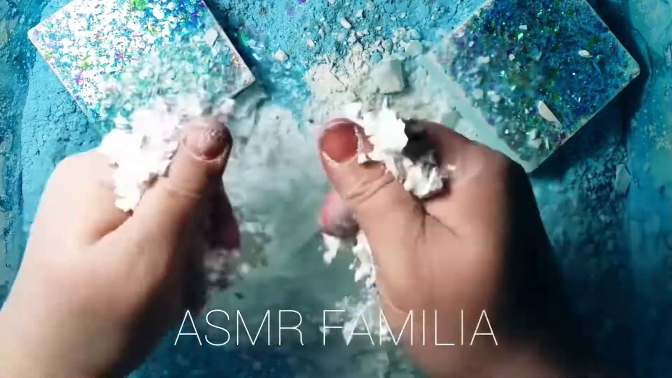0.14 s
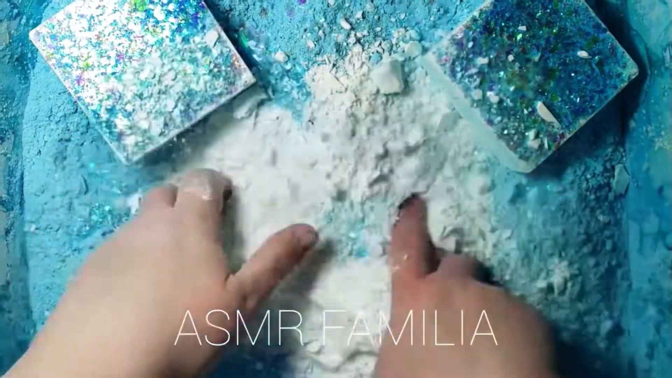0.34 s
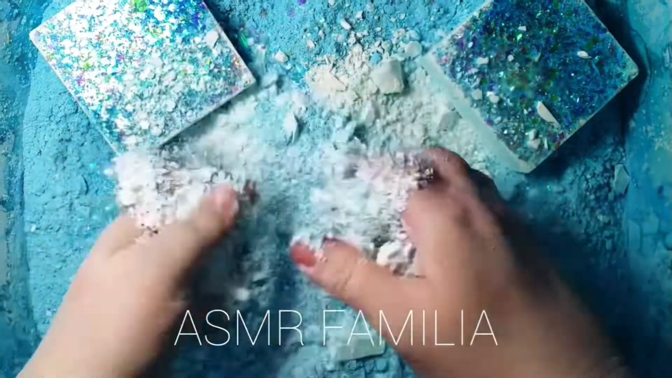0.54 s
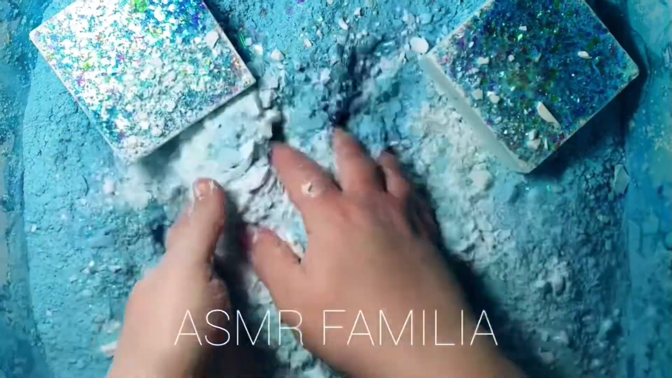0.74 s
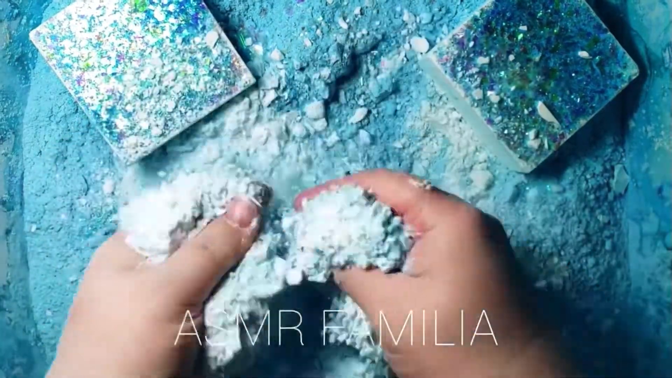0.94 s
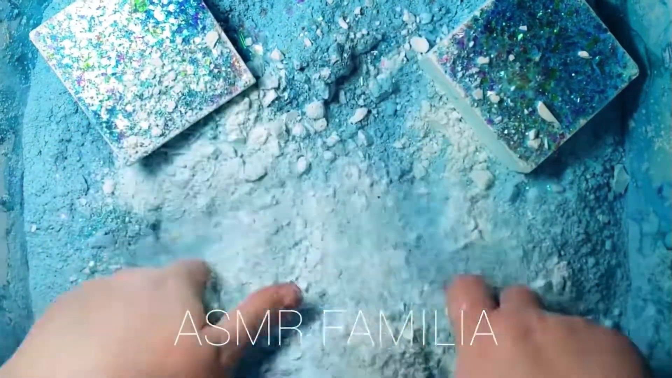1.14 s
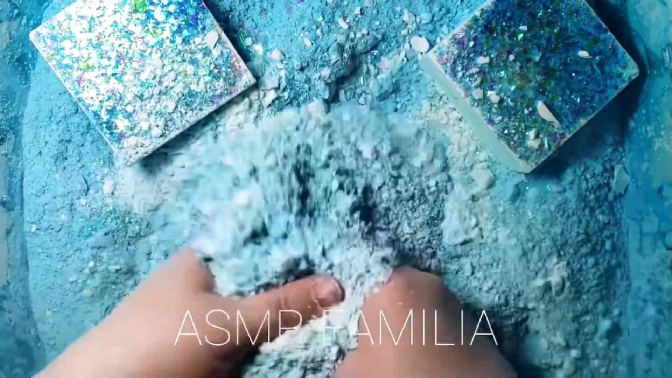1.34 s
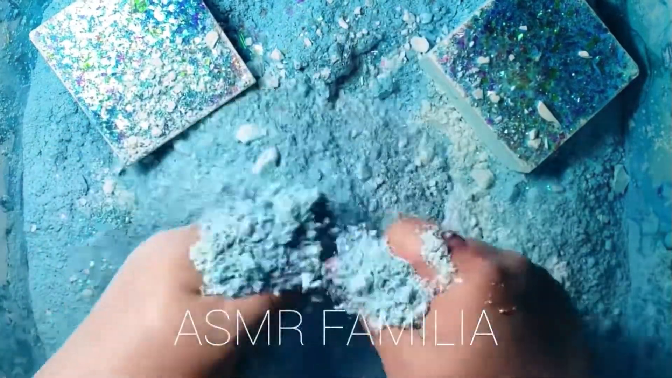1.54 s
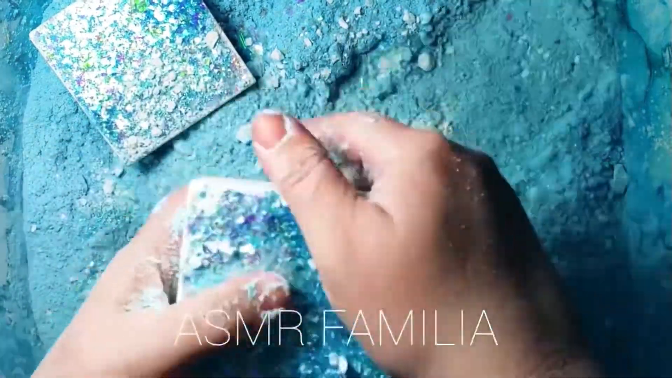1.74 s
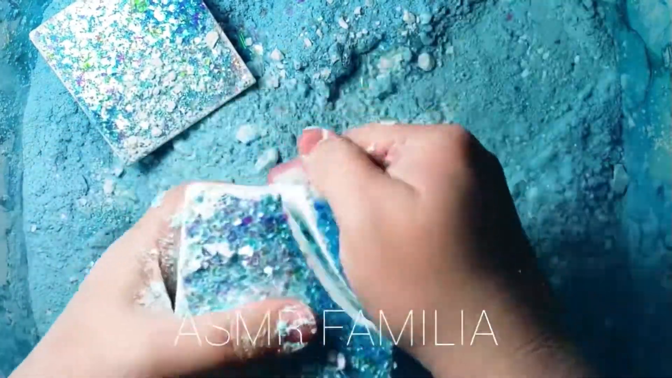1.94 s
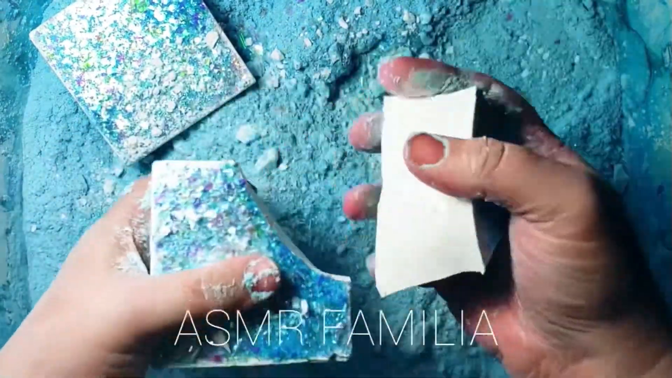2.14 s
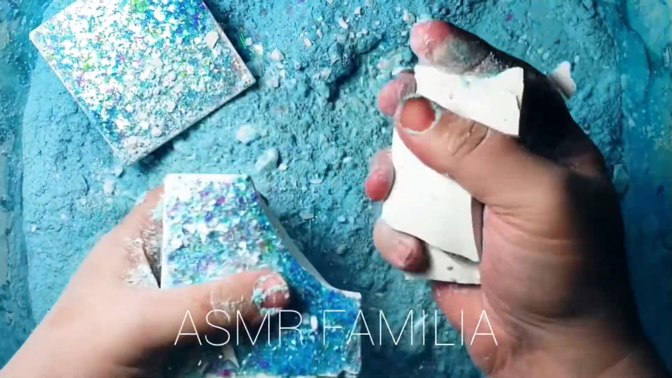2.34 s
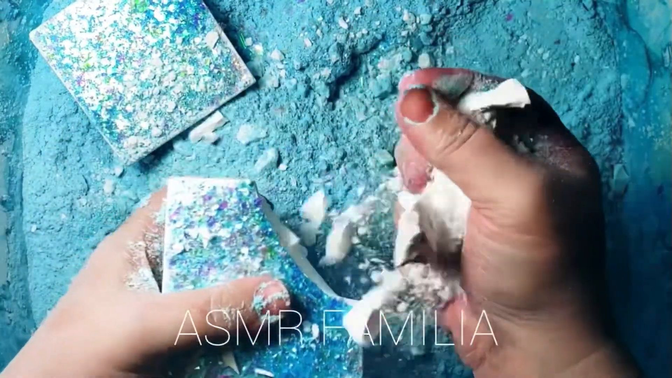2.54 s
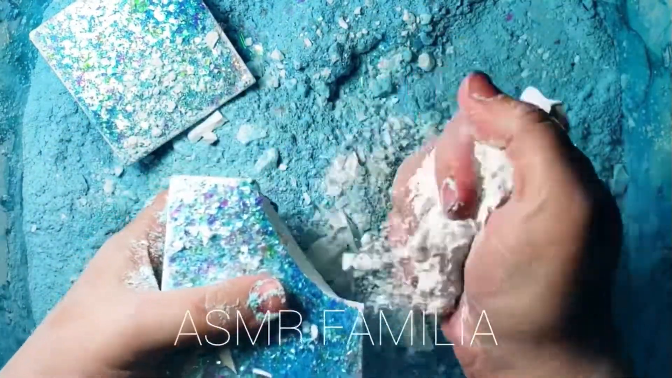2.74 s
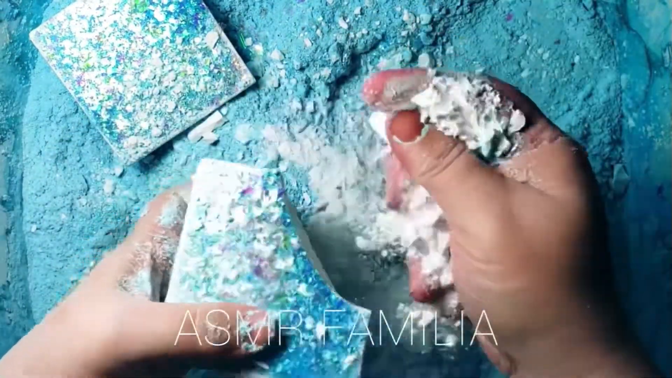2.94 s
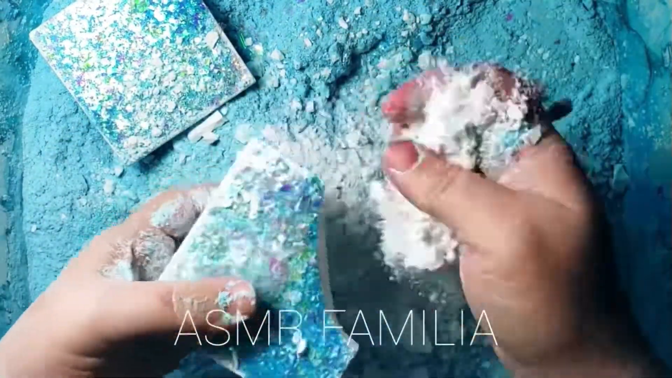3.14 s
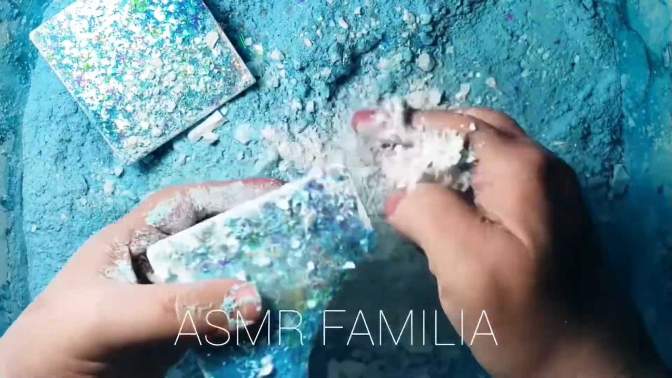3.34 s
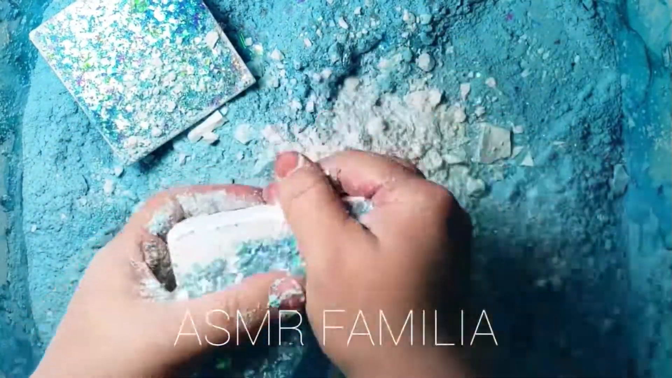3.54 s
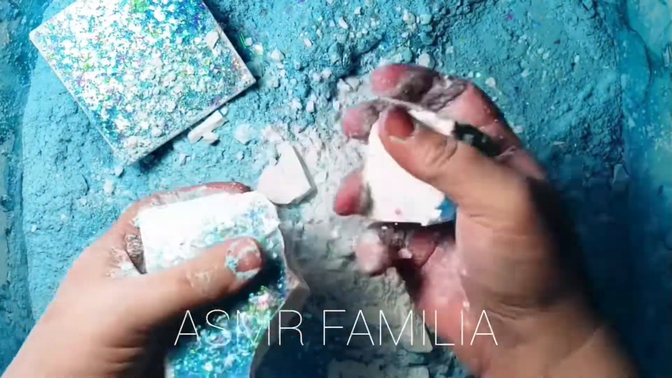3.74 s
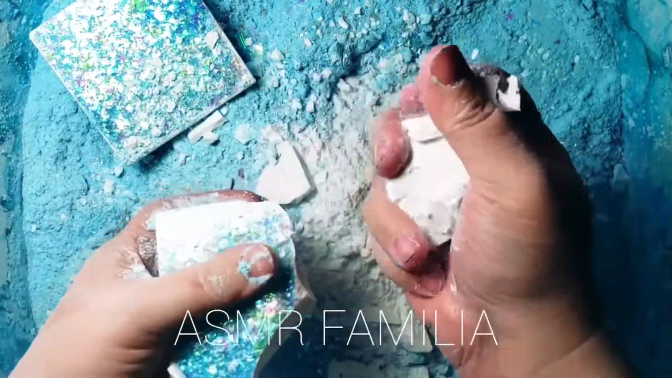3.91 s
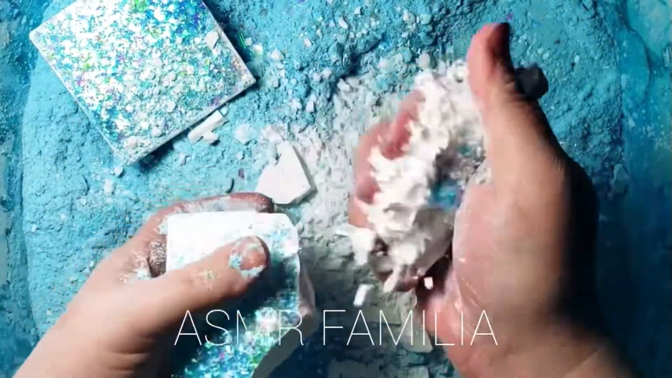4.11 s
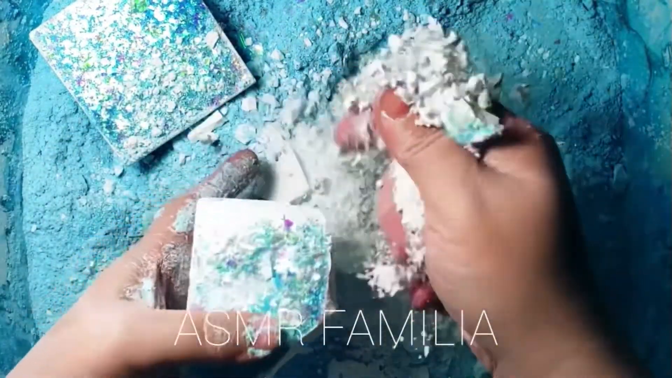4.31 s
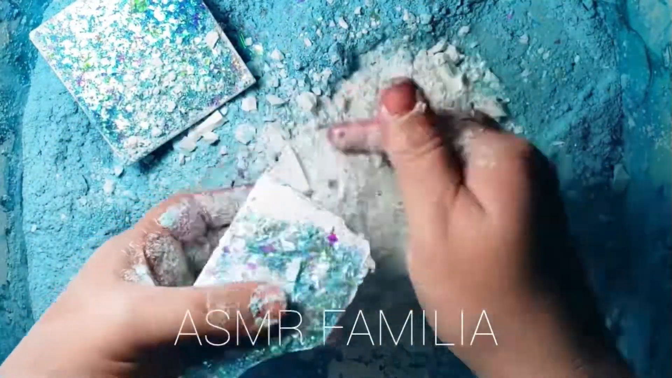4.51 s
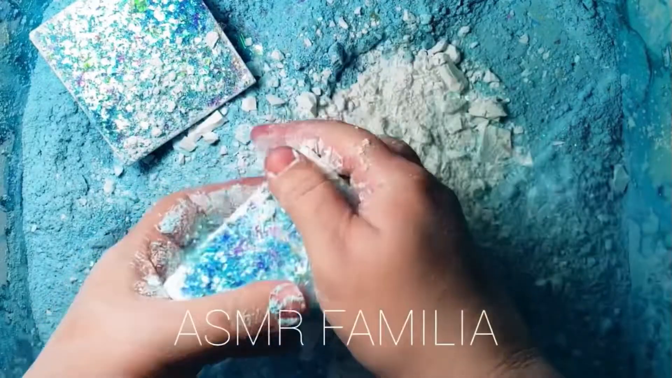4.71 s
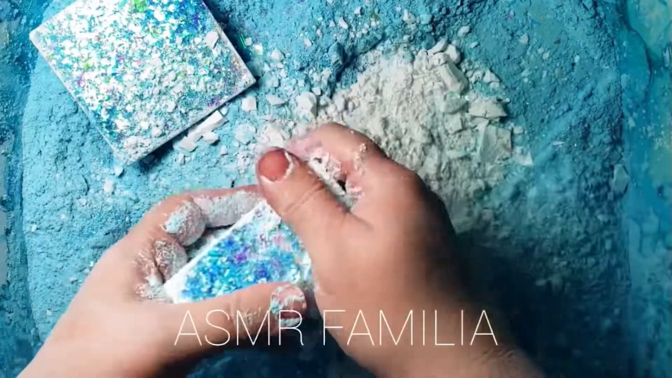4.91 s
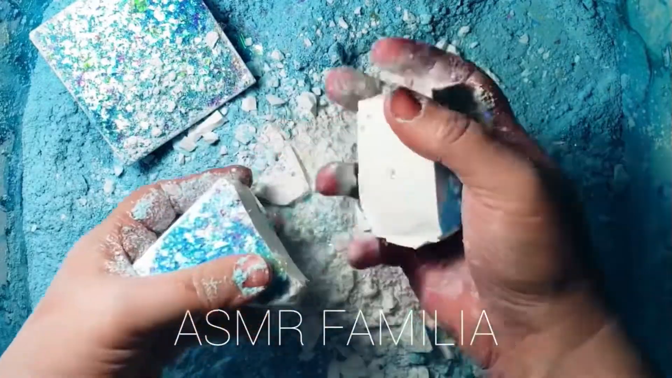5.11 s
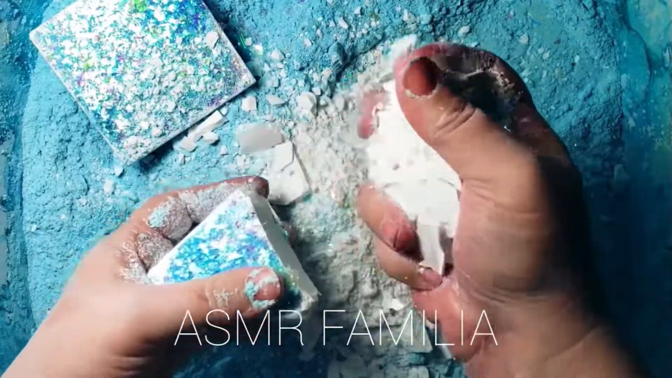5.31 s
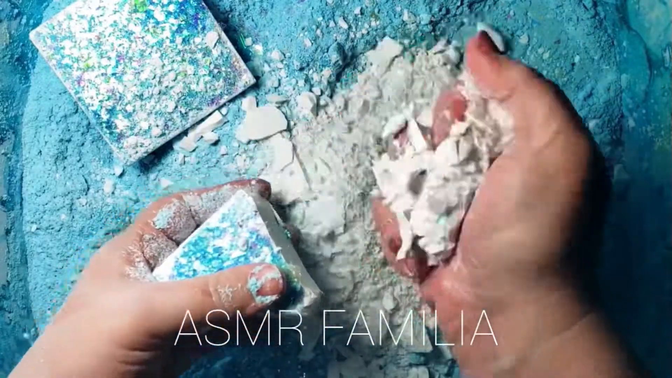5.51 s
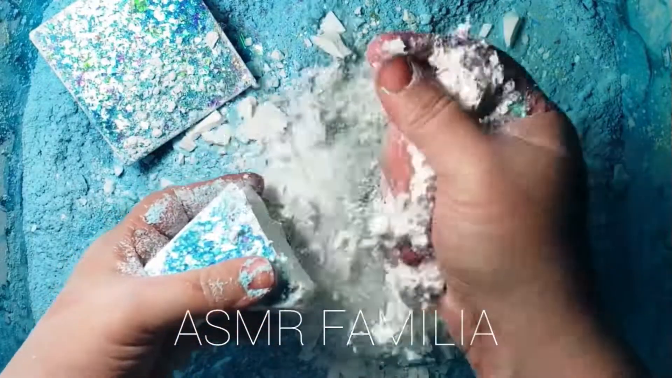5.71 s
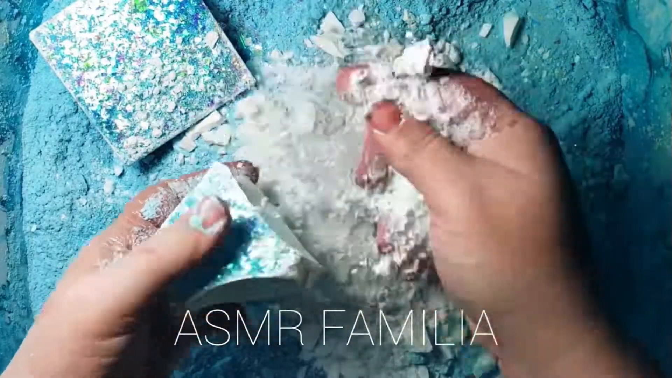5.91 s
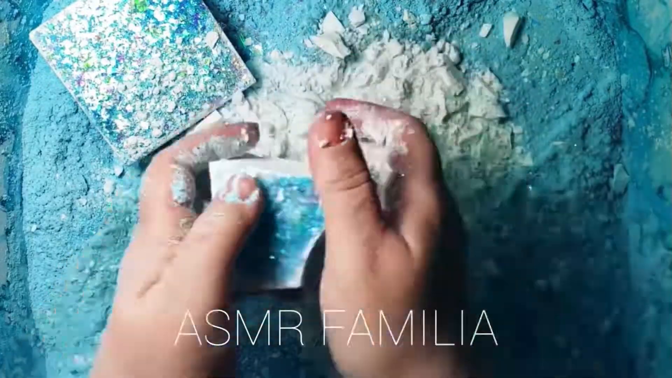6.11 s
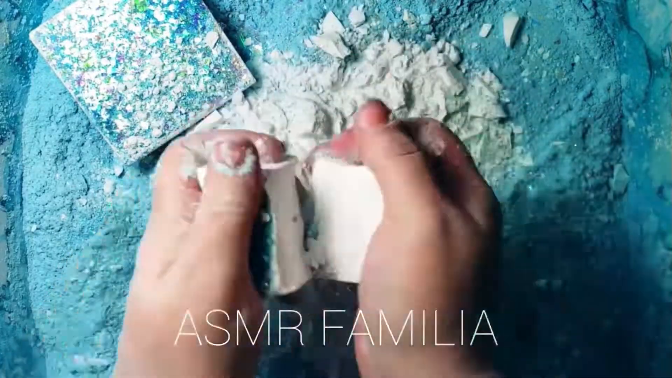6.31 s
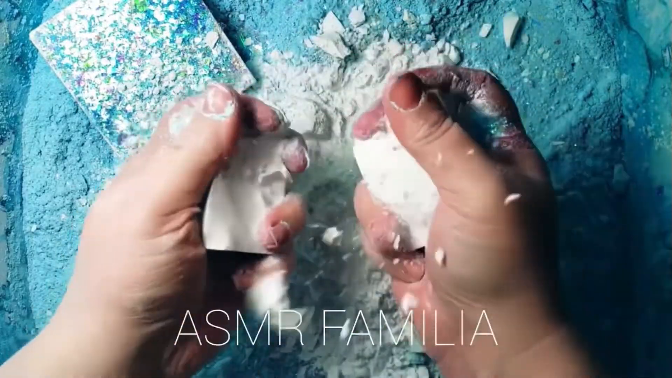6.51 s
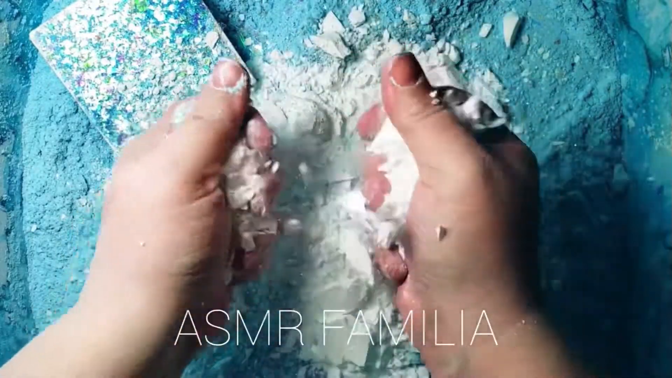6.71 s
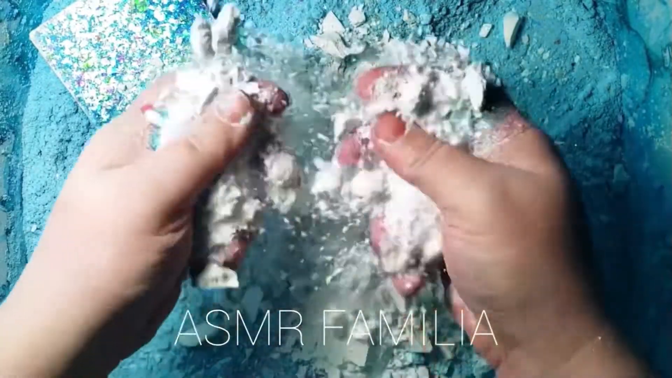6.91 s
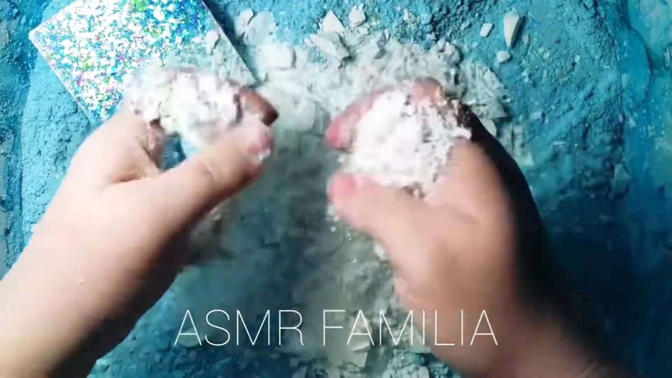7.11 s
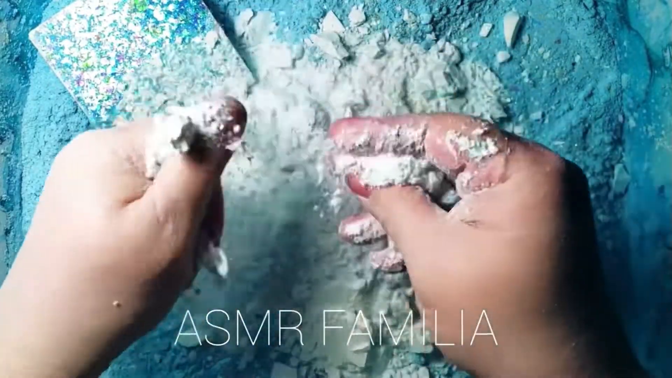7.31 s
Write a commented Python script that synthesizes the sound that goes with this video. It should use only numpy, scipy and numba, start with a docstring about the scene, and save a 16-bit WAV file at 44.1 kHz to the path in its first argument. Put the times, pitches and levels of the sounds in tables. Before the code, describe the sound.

Hands crush brittle chalk blocks over a powder-covered tray, very close to the microphone and nearly mono. Crunches and splinters open, then softer, duller powder squeezing follows. From about two seconds blocks snap sharply and crumble into grit, with short powdery hisses between breaks. The hardest cracks cluster near the end before a softer crumble, over a steady low hum.

```python
"""Two hands crush soft chalk blocks over a tray of powder, heard close.
Blocks give way in knocks and ragged crunches; splinters snap as short jolts, rings and ticks of noise.
Lumps, grit and dust crumble as dense random grains of filtered noise, and powder hisses under the fingers.
A ventilation hum, made of shaped noise, drones below.
Twice the level drops suddenly and fades back in; the loudest peaks clip."""
import sys
import numpy as np
from scipy import signal
from scipy.fft import rfft, irfft
from scipy.io import wavfile
from scipy.ndimage import uniform_filter1d
from numba import njit

SR = 44100
rng = np.random.default_rng(int(sys.argv[2]) if len(sys.argv) > 2 else 0)


def pcm_store(signal):
    """Save signal as 16-bit PCM."""
    levels = np.round(np.clip(np.atleast_2d(signal), -1, 1) * 32767)
    wavfile.write(sys.argv[1], SR, levels.astype(np.int16).T)


N = 324135  # length in samples
CONTROL_STEP = 128  # samples between points of a slow level curve


def undb(db):
    """Decibels to gain."""
    return 10 ** (np.asarray(db) / 20)


def level(x, db):
    """Scale to an rms level."""
    return x * undb(db) / np.sqrt(np.mean(x ** 2))


def walk(rate_hz):
    """Random levels, one per 1 / rate_hz seconds, smoothed into one another."""
    hold = int(SR / rate_hz)
    steps = np.repeat(rng.standard_normal(N // hold + 1), hold)
    return 0.7 * uniform_filter1d(steps, hold)[:N]


@njit
def grains(start_s, pitch_hz, width, t60_s, size, rise_s, noise):
    """Each grain is a burst of the given drive that rises, dies and passes through its own resonance."""
    out = np.zeros(len(noise))
    for e in range(len(start_s)):
        g = np.tan(np.pi * pitch_hz[e] / SR)
        damping = width  # resonance width / pitch
        fade = np.exp(-np.log(1000.) / (t60_s[e] * SR))  # 60 dB down after t60_s
        # narrow resonances pass less noise, so they are driven harder
        drive = size[e] / np.sqrt(g * damping / (1 + g * damping))
        band, low, up = 0., 0., 0.  # the two filter memories and the rising onset
        start = int(start_s[e] * SR)
        stop = min(len(noise), start + int(t60_s[e] * SR + 3 / (g * damping)))
        for i in range(start, stop):
            up += (1 - up) / (1 + rise_s * SR)
            push = drive * up * noise[(i + 977 * e) % len(noise)]  # each grain reads another stretch
            v = (band + g * (push - low)) / (1 + g * (g + damping))
            band = 2 * v - band
            low = low + 2 * g * v
            drive *= fade
            out[i] += damping * v
    return out


# colour of the hum: pitch_hz, density_db (dB per Hz, relative)
HUM_COLOUR = [(15, -42), (25, -11), (92, 0), (117, 4), (201, -11), (284, -8.5), (520, -26), (880, -23.5),
              (1500, -61)]
# loudness of the hum over time: time_s, level_db (rms)
HUM_LEVEL = [(0, -29.5), (5.2, -30.5), (6.1, -33.5), (6.6, -32), (7.35, -29)]


def hum():
    """Air rumbling in a duct, strongest near its resonance: noise with a shaped spectrum."""
    pitch_hz, density_db = np.transpose(HUM_COLOUR)
    f = np.arange(N // 2 + 1) * SR / N
    gain = undb(np.interp(np.log(f + 1), np.log(pitch_hz), density_db, right=-120))
    rumble = irfft(rfft(rng.standard_normal(N)) * gain, N)
    return level(rumble, np.interp(np.arange(N) / SR, *np.transpose(HUM_LEVEL)))


# hand movements (rub, scoop, squeeze, crumble): start_s, hold_s, lumps_db, grit_db, dust_db
MOVES = [(0.04, 0.15, -47, -33.5, -32), (0.382, 0.06, -41, -34, -37), (0.557, 0.031, -43, -39, -38.5),
         (0.69, 0.15, -29, -40, -57), (0.98, 0.11, -53, -34.5, -36), (1.167, 0.022, -32, -55, -63),
         (1.22, 0.11, -28.5, -63, -70), (1.385, 0.03, -27.5, -47, -60), (1.473, 0.11, -36.5, -32, -40.5),
         (2.262, 0.03, -46, -38, -38), (2.448, 0.064, -55, -31, -32.5), (2.68, 0.018, -40, -34.5, -34.5),
         (2.83, 0.25, -42.5, -36.5, -36.5), (3.184, 0.062, -47, -41, -37.5), (3.889, 0.095, -60, -32, -29),
         (4.203, 0.18, -41.5, -33.5, -34), (5.283, 0.05, -47, -27.5, -56),
         (5.465, 0.076, -47, -34.5, -35.5), (5.682, 0.035, -42.5, -35.5, -34),
         (5.92, 0.013, -44.5, -38.5, -35), (6.53, 0.011, -32.5, -31.5, -30), (6.65, 0.12, -39, -25.5, -29),
         (6.943, 0.11, -39.5, -31.5, -34.5), (7.241, 0.09, -48, -38, -41)]
# levels at rest, rows for lumps, grit, dust: before_db, after_db (either side of the last dropout)
STILL = [(-42, -56.5), (-46, -56), (-67, -42.5)]
SWELL_DB_S, SETTLE_DB_S = 226, 97  # how fast a movement builds and dies away, dB per second


def handling():
    """Levels in dB of lumps, grit and dust: movements swell, hold, settle and never cross the last dropout."""
    t = np.arange(0, N, CONTROL_STEP) / SR
    start_s, hold_s, *move_db = np.transpose(MOVES)[:, :, None]
    swell_db = -SWELL_DB_S * np.maximum(start_s - t, 0)
    settle_db = -SETTLE_DB_S * np.maximum(t - start_s - hold_s, 0)
    shape_db = swell_db + settle_db
    last_s = DROPOUTS[-1][0]
    same_side = (start_s < last_s) == (t < last_s)
    levels_db = []
    for db, still_db in zip(move_db, STILL):
        still_power = undb(np.where(t < last_s, *still_db)) ** 2
        move_power = np.sum(same_side * undb(db + shape_db) ** 2, axis=0)
        power_db = 10 * np.log10(still_power + move_power)
        levels_db.append(np.interp(np.arange(N) / SR, t, power_db))
    return levels_db


# lumps, grit and dust: lowest_hz, highest_hz, grains_per_s, base_t60_s, size_scatter_db
SIZES = [(187, 1550, 2400, 0.006, 3.5), (1040, 6000, 860, 0.009, 1.5), (4450, 22000, 2000, 0.013, 5.5)]
# how much each follows the flurries (factor): lumps, grit, dust
FLURRY_SHARE = (0.08, 1.12, 1.4)
# resonance width / pitch: lumps, grit, dust
GRAIN_WIDTH = (0.5, 0.61, 0.94)


def crumble(busy_db):
    """Lumps, grit and dust break at random; they come in shared flurries as the fingers slip."""
    out = 0
    flurry_db = 2.0 * walk(40) + 0.61 * walk(140)
    for sizes, db, share, width in zip(SIZES, busy_db, FLURRY_SHARE, GRAIN_WIDTH):
        lo_hz, hi_hz, rate, base_t60_s, scatter_db = sizes
        when, pitch, life, big = rng.random((20000, 4))[:int(rate * N / SR)].T
        pitch_hz = lo_hz * (hi_hz / lo_hz) ** pitch
        t60_s = base_t60_s * (1.25 + 3.2 * life)
        size = undb(-scatter_db * np.log(1 - .993 * big))  # many small grains, a few large
        noise = rng.standard_normal(N)
        bed = grains(when * N / SR, pitch_hz, width, t60_s, size, 0.00018, noise)
        # small grains radiate no bass
        bed = signal.lfilter(*signal.butter(2, 0.44 * lo_hz, "high", fs=SR), bed)
        out = out + level(bed * undb(share * flurry_db), db)
    return out


# loud single fragments snapping: start_s, level_db, pitch_hz (centre of their splinters)
SNAPS = [(0.068, -9, 2500), (0.1351, -2.5, 2600), (0.156, -4.5, 4840), (0.2603, -8.5, 2510),
         (0.42, -8.5, 5900), (0.4265, -12.5, 2900), (0.4842, -11, 4400), (1.024, -12, 5240),
         (1.0602, -8.5, 5600), (1.283, -12.5, 513), (1.391, -13, 1040), (1.4655, -5, 2900),
         (1.507, -12, 764), (1.5597, -12, 1550), (1.5745, -6, 2870), (1.5813, -6, 3300), (1.9132, -4, 1420),
         (1.9564, -11.5, 6200), (1.967, -16, 5000), (2.185, -21, 4680), (2.2574, -1, 4200),
         (2.3983, -5, 1610), (2.46, -3, 2600), (2.5, -0.5, 2600), (2.5362, -8, 2600), (2.553, -12, 4300),
         (2.6333, -1.5, 7050), (2.6494, -5.5, 7100), (2.6992, -8.5, 4010), (2.8135, -12, 3070),
         (2.861, -5.5, 5260), (2.925, -14, 4530), (2.957, -13, 1965), (3.026, -15, 1192),
         (3.052, -20, 1190), (3.1, -21, 1300), (3.5931, -5.5, 2850), (3.6298, -1, 5760),
         (3.7344, -5.5, 7000), (3.824, 0.5, 3540), (3.862, 5, 2640), (3.919, 0, 2830), (3.928, -7, 2800),
         (3.937, -1, 4640), (3.9422, -2.5, 2900), (3.9585, -4, 8500), (3.967, -4, 9350), (3.9815, -4, 4570),
         (4.0225, -11, 1210), (4.0331, -1.5, 5800), (4.041, -6, 5000), (4.046, -13.5, 1320),
         (4.153, -11.5, 5630), (4.249, -7, 7700), (4.288, -17, 1200), (4.367, -12.5, 1480),
         (4.8701, 4, 6400), (5.099, -18.5, 4960), (5.249, -10, 2600), (5.3356, -7, 2600),
         (5.3424, 2.5, 2600), (5.3609, -8, 4070), (5.408, -14, 2600), (5.4384, -5, 2850),
         (5.6416, -14.5, 5030), (5.698, -15, 4900), (5.7242, -9.5, 4900), (5.9052, -12.5, 5550),
         (5.953, -12.5, 4440), (6.468, -15, 7800), (6.497, -3.5, 5030), (6.5204, 5.5, 1910),
         (6.526, 9, 4240), (6.548, -3, 4800), (6.561, -3, 4630), (6.6229, 4, 5700), (6.676, -4.5, 4770),
         (6.7015, -4, 1480), (6.71, -4, 5060), (6.7171, 10, 4640), (6.7393, 1, 4460), (6.75, -3, 3566),
         (6.7629, 2, 4800), (6.7812, -7, 4230), (6.963, -3.5, 6820), (7.071, -9.5, 1330),
         (7.317, -10.5, 1790)]
# pitch range of the small random fragments: lowest_hz, highest_hz
CRACKLE_RANGE = (886, 7000)
CRACKLE_PER_S = 210
CRACKLE_DB, CRACKLE_SCATTER_DB = 8, 4  # smallest level relative to the grit; scatter above it


def fragments(grit_db):
    """The loud snaps, and many small ones at random that are as strong as the grit is busy."""
    when, pitch, big = rng.random((1800, 3))[:int(CRACKLE_PER_S * N / SR)].T
    nearby_grit_db = grit_db[(when * N).astype(int)]
    level_db = nearby_grit_db + CRACKLE_DB - CRACKLE_SCATTER_DB * np.log(1 - .9 * big)
    lo_hz, hi_hz = CRACKLE_RANGE
    pitch_hz = lo_hz * (hi_hz / lo_hz) ** pitch
    return np.hstack([np.transpose(SNAPS), [when * N / SR, level_db, pitch_hz]])


# a fragment parts in steps: latest_s (after the snap), pitch_ratio (before scatter), level_db (relative)
SPLINTERS = [(0, 0.93, 0), (.002, .5, -9), (.0008, 2.1, 0), (.004, .8, -4)]
TICK_DB, TAIL_DB = -11, -26.5  # drive of the noise tick and its tail, relative to the snap
SPIKE_DB, SPIKE_T60_S = -5, .00025  # drive of each splinter's jolt; length of the push for jolt and ring
RING_DB, RING_WIDTH = -1, .12  # a splinter's own ring: relative drive, width / pitch
SPIKE_SCATTER_DB = 2.5  # random spread either way, splinter to splinter


def snaps(grit_db):
    """Splinters part within milliseconds, each a jolt and a ring, in a noise tick; also a treble burst
    of noise, opposite in the two channels."""
    start_s, level_db, pitch_hz = fragments(grit_db)
    t60_s = .009 * (pitch_hz / 4000) ** -.5  # high ticks die sooner
    signs = np.sign(rng.standard_normal(N))
    tick = grains(start_s, pitch_hz, 1.2, t60_s, undb(level_db + TICK_DB), 0.00095, signs)
    tail_size = undb(level_db + TAIL_DB)
    noise = rng.standard_normal(N)
    tail = grains(start_s, 0.52 * pitch_hz, 1.0, 7.4 * t60_s, tail_size, 0.000064, noise)
    out = tick + tail
    for latest_s, ratio, part_db in SPLINTERS:
        when, pitch, big = rng.random((2000, 3))[:len(start_s)].T
        part_s = start_s + latest_s * when
        part_hz = np.clip(pitch_hz * ratio ** (.5 + pitch), 900, 13000)
        size = undb(level_db + part_db + 2 * SPIKE_SCATTER_DB * (big - .5))
        push_s = SPIKE_T60_S + 0 * start_s
        for width, drive_db in ((1., SPIKE_DB), (RING_WIDTH, RING_DB)):
            out = out + grains(part_s, part_hz, width, push_s, size * undb(drive_db), 0., np.ones(N))
    # only the listed loud snaps get the opposite burst: mostly faint, a few strong
    loud = len(SNAPS)
    side_size = rng.standard_normal(2000)[:loud] ** 3 * undb(level_db[:loud] - 22)
    same = 0 * side_size
    noise = rng.standard_normal(N)
    aside = grains(start_s[:loud], 9000 + same, 0.78, 0.019 + same, side_size, 0.0011, noise)
    return out, aside


# blocks giving way: start_s, crunch_db, knock_db (relative to crunch), knock_hz,
# sizzle_db (relative to crunch), base_t60_s
CRACKS = [(0.0673, -6.5, -6, 573, -18, 0.1), (0.1338, -11, -2, 1030, -10, 0.04),
          (0.398, -13, -1.5, 536, 6, 0.095), (1.9138, -20, 17.5, 330, -13, 0.019),
          (2.2562, -2, -12.5, 306, 4, 0.051), (2.3163, -14.5, -6.5, 515, 5, 0.31),
          (2.395, -4, -2, 1610, 2, 0.19), (2.485, -12, -23, 720, 9, 0.18),
          (3.5919, -8, -9.5, 427, -20, 0.22), (3.821, -4, -7.5, 373, -2.5, 0.19),
          (3.862, -9.5, -2, 1430, -23, 0.12), (4.021, -4, -12, 890, 10, 0.021),
          (4.9546, -7, -4.5, 310, -22, 0.22), (5.2025, -7.5, -2, 854, 8.5, 0.032),
          (5.242, -10, -19, 272, 2, 0.053), (5.273, -2, -4, 2400, -3, 0.28),
          (5.3418, 5, -29, 888, 1.5, 0.04), (6.252, -10, -2.5, 355, 0.5, 0.21),
          (6.5197, 11, -10.5, 406, 2.5, 0.045), (6.605, -6, -1, 1660, -15, 0.13),
          (6.6205, 4, -7, 1410, 4.5, 0.067), (6.717, 1.5, -17, 864, -10, 0.046)]


def cracks():
    """A block gives way: a knock through the hand, then a ragged fracture that runs on and dies out."""
    start_s, crunch_db, knock_db, knock_hz, sizzle_db, base_t60_s = np.transpose(CRACKS)
    knock_size = undb(crunch_db + knock_db - 9.0)
    knock_t60_s = 0.0053 + 0 * start_s
    out = grains(start_s, knock_hz, 0.79, knock_t60_s, knock_size, 0.00017, -np.ones(N))
    ragged = undb(3.3 * walk(300))
    same = 0 * start_s
    # fracture bands: pitch_hz, width / pitch, share of base_t60_s, level_db
    parts = [(knock_hz, .9, 1.1, crunch_db + knock_db - 11),
             (1150 + same, .55, 1.1, crunch_db - 15.5),
             (2900 + same, .9, .9, crunch_db - 19),
             (6500 + same, .8, .8, crunch_db + sizzle_db - 19.5),
             (11000 + same, .7, .7, crunch_db + sizzle_db - 22.5)]
    for pitch_hz, width, share, part_db in parts:
        noise = ragged * rng.standard_normal(N)
        out = out + grains(start_s, pitch_hz, width, share * base_t60_s, undb(part_db), 0.00052, noise)
    return out


# fingertips brushing powder: middle_s, level_db
BRUSHES = [(0.3, -33.5), (1.69, -41), (1.811, -35), (2.03, -34.5), (2.17, -32.5), (2.23, -34), (3.33, -37),
           (3.475, -31.5), (3.765, -36), (4.54, -34.5), (4.655, -36), (4.73, -39.5), (4.798, -36.5),
           (5.1, -37), (6.03, -38), (6.16, -41.5), (6.37, -37), (6.449, -34.5)]
# pitch range of the hisses: lowest_hz, highest_hz
RUSTLE_RANGE = (3000, 14300)
RUSTLE_PER_S, RUSTLE_WIDTH, RUSTLE_T60_S = 260, 0.19, 0.092  # sliding skin patches; width / pitch
BRUSH_DB_S = 211  # rises and falls alike, dB per second


def brushing():
    """Skin slides over powder: overlapping hisses in narrow bands of their own, so the colour shifts."""
    when, pitch, big = rng.random((4000, 3))[:int(RUSTLE_PER_S * N / SR)].T
    lo_hz, hi_hz = RUSTLE_RANGE
    pitch_hz = lo_hz + (hi_hz - lo_hz) * pitch
    t60_s = RUSTLE_T60_S + 0 * pitch_hz
    noise = rng.standard_normal(N)
    rustle = grains(when * N / SR, pitch_hz, RUSTLE_WIDTH, t60_s, undb(8.0 * big), 0.0076, noise)
    rustle = level(rustle * undb(2.2 * walk(70)), 0)
    t = np.arange(0, N, CONTROL_STEP) / SR
    power = sum(undb(db - BRUSH_DB_S * np.abs(t - middle_s)) ** 2 for middle_s, db in BRUSHES)
    return rustle * np.interp(np.arange(N) / SR, t, np.sqrt(power))


# colour of chalk, tray and microphone: pitch_hz, width_hz, level_db (boost or cut)
BODY = [(284, 490, 6.5), (1120, 180, 3.5), (1910, 730, -3.5), (2600, 720, 3.5), (3750, 670, -4),
        (4820, 510, 3), (10000, 3500, 4.5)]


def body(x):
    """Broad resonances lift some parts of the spectrum and lower others."""
    out = x
    for pitch_hz, width_hz, db in BODY:
        resonance = signal.lfilter(*signal.iirpeak(pitch_hz, pitch_hz / width_hz, SR), x)
        out = out + (undb(db) - 1) * resonance
    return out


def scene():
    """Nearly everything reaches both channels alike; only the treble of the loud snaps differs."""
    busy_db = handling()
    snapping, aside = snaps(busy_db[1])
    mid = body(crumble(busy_db) + snapping + cracks() + brushing()) + hum()
    return np.array([mid + aside, mid - aside])


# moments when the level drops suddenly and fades back in: start_s, fade_in_s
DROPOUTS = [(0.358, 0.026), (1.654, 0.015)]
TOP_HZ = 15800  # little passes above this


def record(dry):
    """Dropouts fade back in from 3 % of full level; then hard clipping and a steep cut at the top."""
    t = np.arange(N) / SR
    for start_s, fade_s in DROPOUTS:
        dry = dry * np.where(t < start_s, 1, np.clip((t - start_s) / fade_s, .03, 1))
    clipped = np.clip(dry, -.88, .88)
    return signal.sosfilt(signal.ellip(12, .2, 95, TOP_HZ, fs=SR, output="sos"), clipped)


dry = scene()
out = record(dry)
pcm_store(out)
```